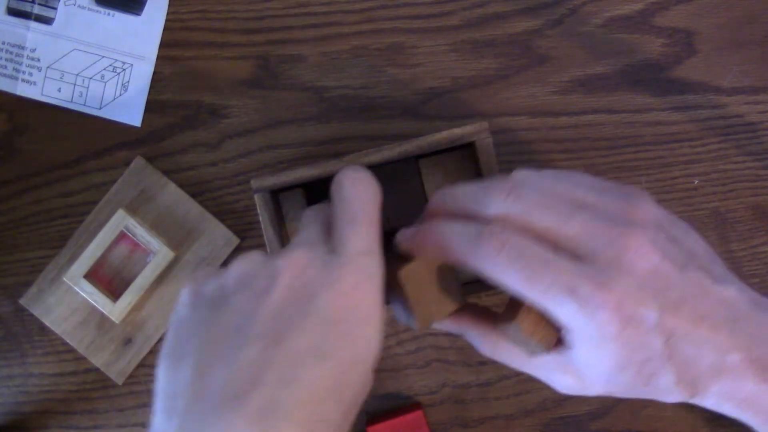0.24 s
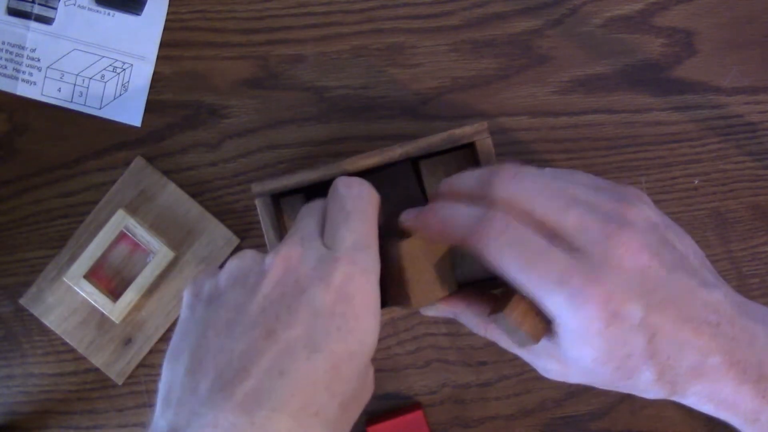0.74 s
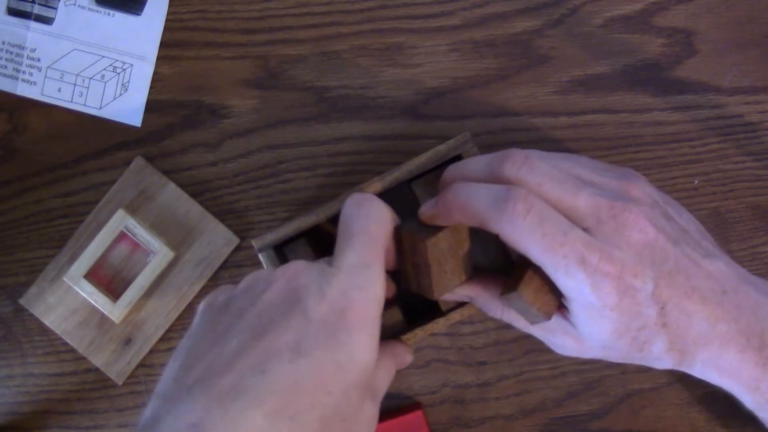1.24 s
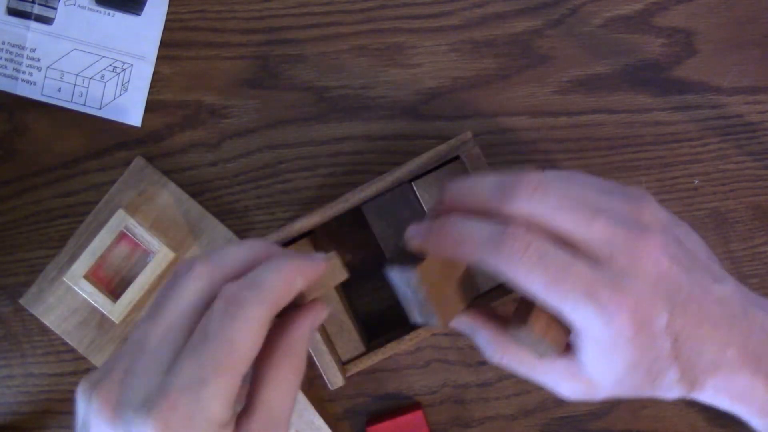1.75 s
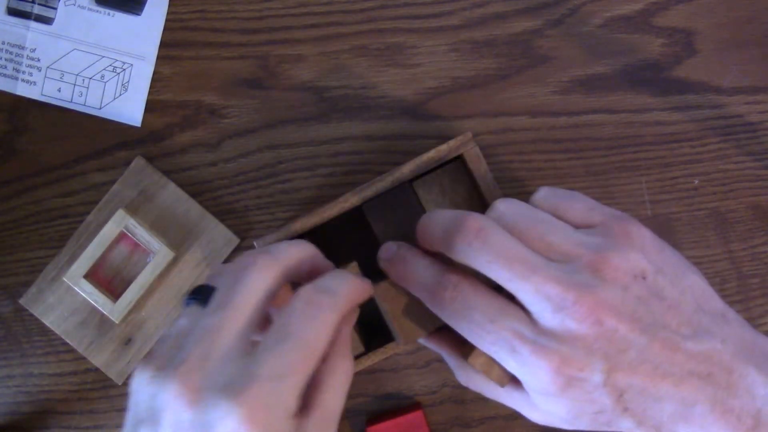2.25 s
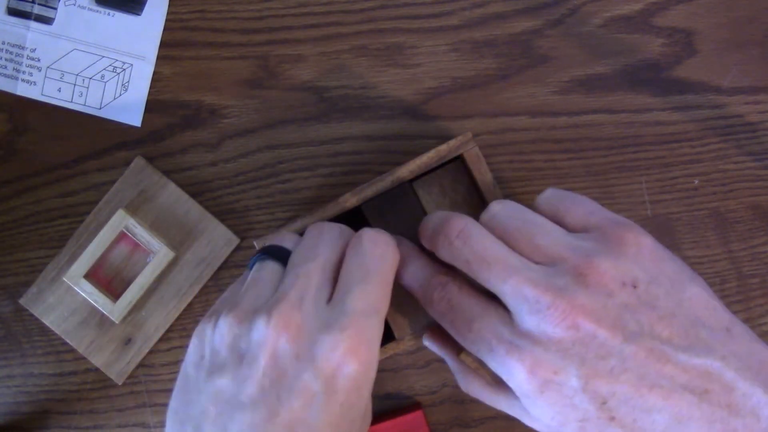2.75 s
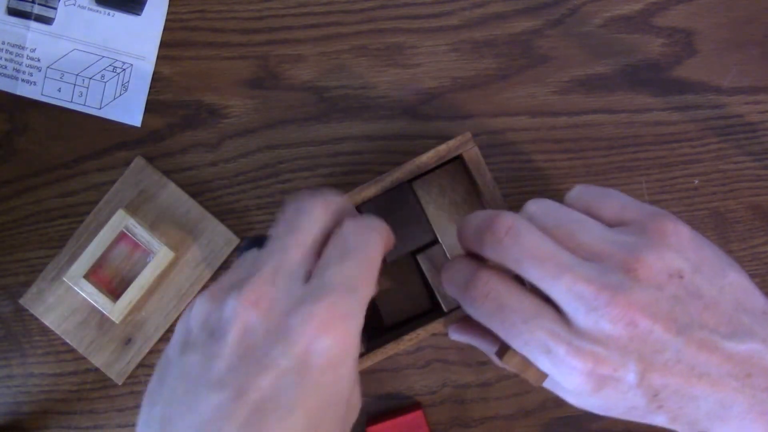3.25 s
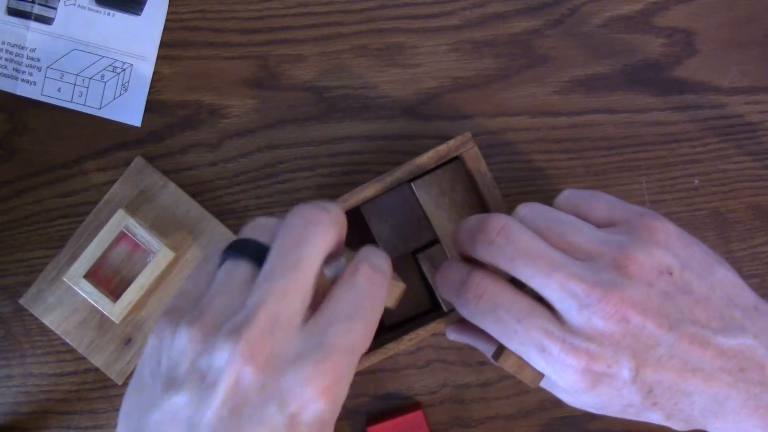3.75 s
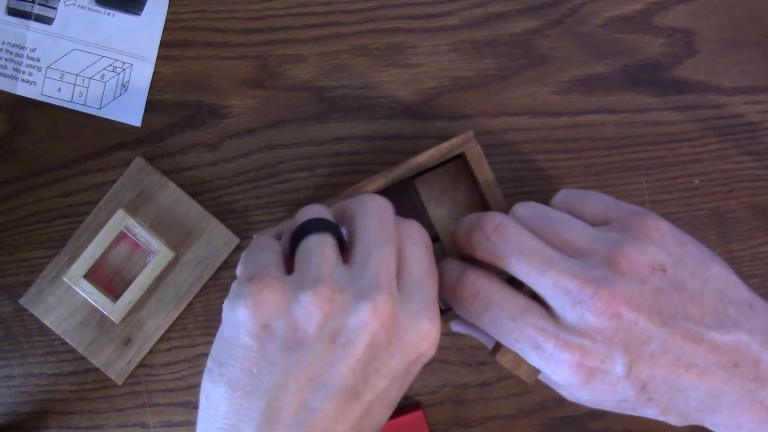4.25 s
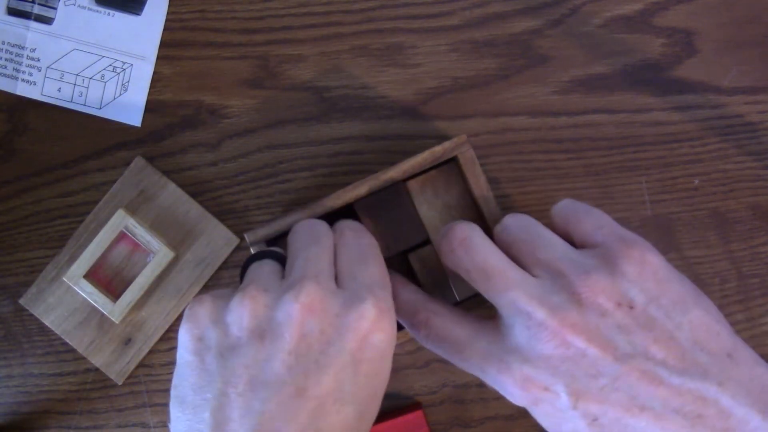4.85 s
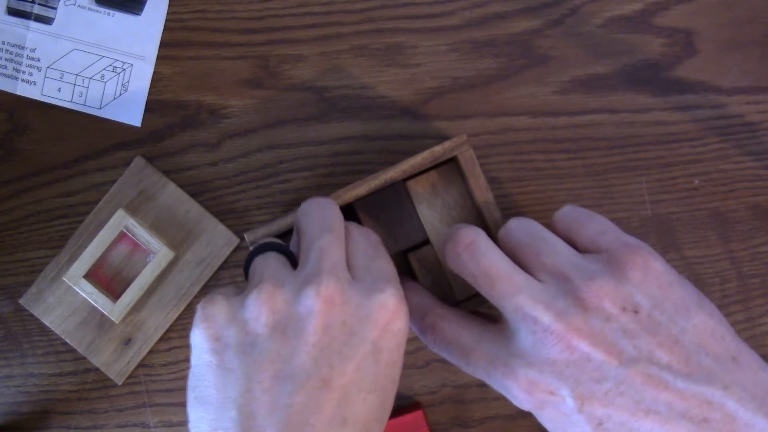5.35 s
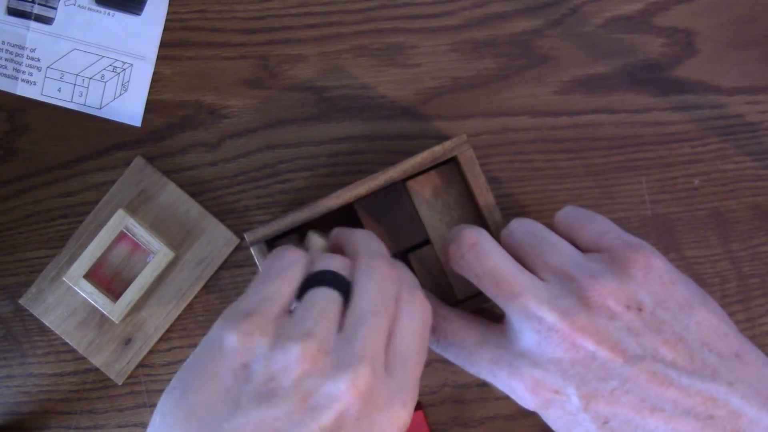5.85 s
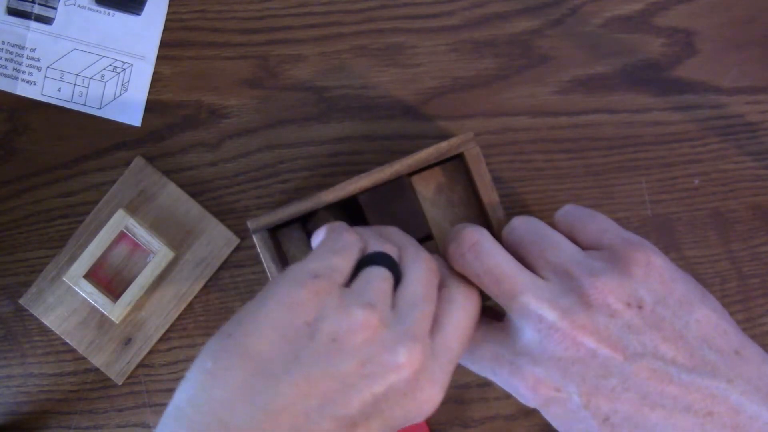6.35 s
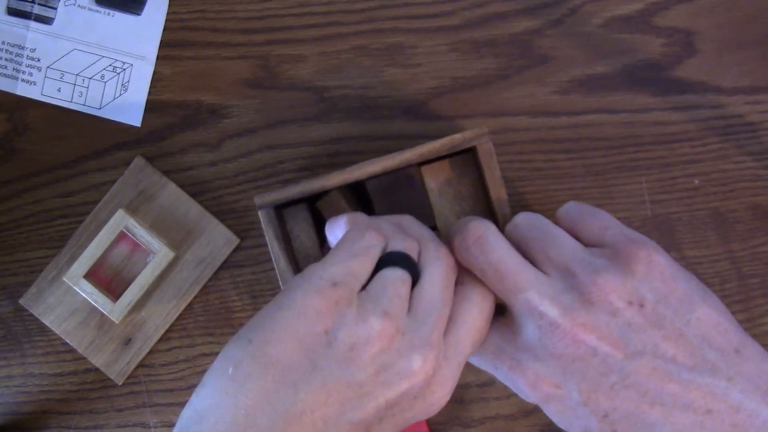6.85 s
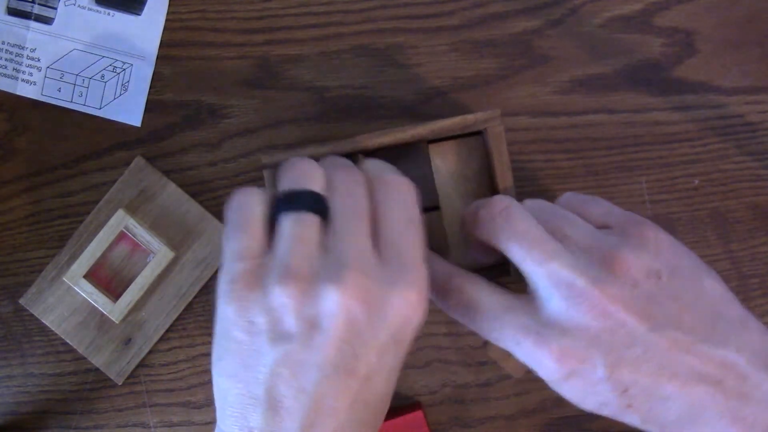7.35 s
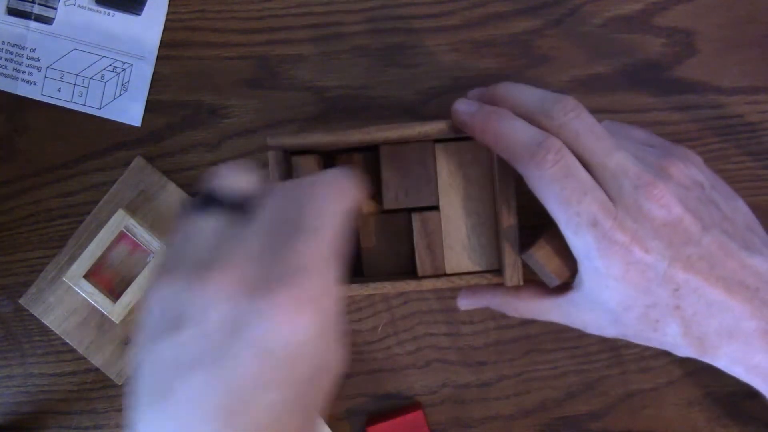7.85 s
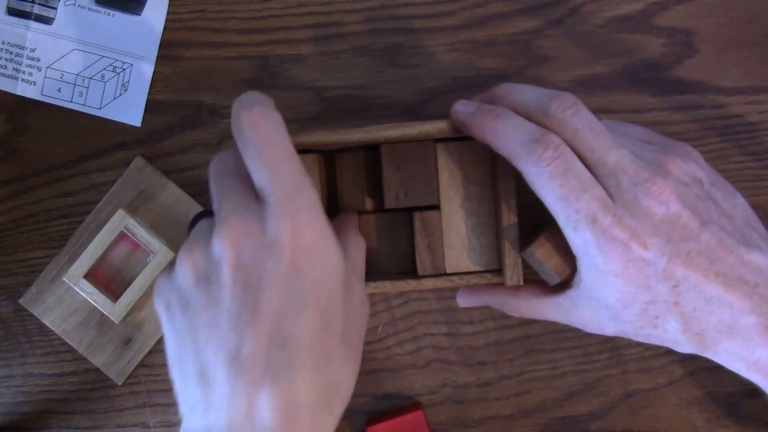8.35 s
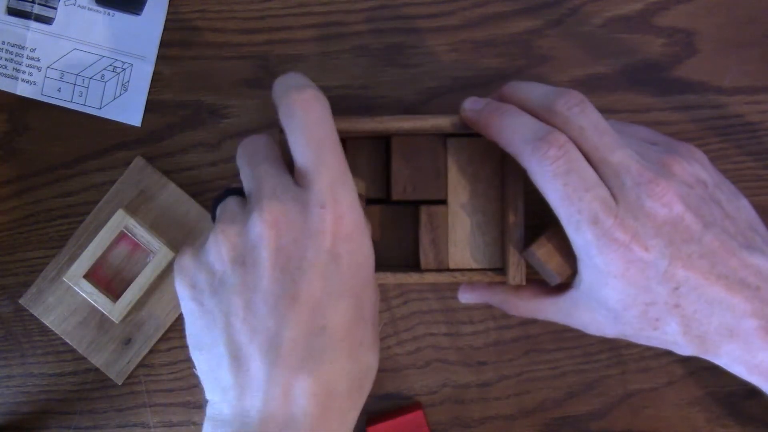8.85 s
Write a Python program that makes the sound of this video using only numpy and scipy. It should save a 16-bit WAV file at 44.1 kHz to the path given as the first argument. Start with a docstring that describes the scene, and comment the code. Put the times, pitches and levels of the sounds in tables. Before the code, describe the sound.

Small hardwood blocks click, clack and scrape sharply inside a little wooden box on a table, with quiet pauses, close in a small room.

```python
"""Hardwood puzzle blocks slid, pressed and dropped into a small wooden box on a table, close, in a small quiet room.
Each contact rings table, box hollow, walls and blocks as damped modes, with a noise snap for the hard edges.
Between contacts, hands and blocks rub (coloured noise in spurts), squeak, judder and rattle; soft low bumps shake the table.
The room answers with near echoes and a short tail, something metal nearby rings faintly as fading noise,
and a limiter catches the hardest clicks on the two-channel track."""
import sys
import numpy as np
from scipy import signal
from scipy.fft import rfft, irfft, next_fast_len
from scipy.io import wavfile
from scipy.ndimage import uniform_filter1d, minimum_filter1d, map_coordinates

SR = 44100
rng = np.random.default_rng(int(sys.argv[2]) if len(sys.argv) > 2 else 0)


def to_wav(s):
    """Save 16-bit WAV."""
    ch = np.atleast_2d(s).T  # columns
    pcm = np.round(np.clip(ch, -1, 1) * 32767)  # PCM
    wavfile.write(sys.argv[1], SR, pcm.astype(np.int16))


N = 401310  # samples in the take
T = np.arange(int(.4 * SR)) / SR  # time axis of one contact, s

# The room's hush at the microphone. Each row: frequency in Hz, relative level in dB per Hz.
HUSH_SPECTRUM = [(25, -13.5), (70, -9.5), (125, -2.5), (300, 0), (480, -1.5), (700, -3.5), (1000, -7.5),
                 (1300, -7), (2000, -15.5), (3000, -14.5), (6000, -22.5), (11000, -25.5), (16000, -38.5)]
# Near surfaces that echo. Each row: delay in seconds, gain as a factor.
ECHOES = [(.0029, 0.25), (.0078, .2), (0.0138, .12)]
# How fast the room's tail dies. Each row: frequency in Hz, t60 in seconds.
ROOM_T60 = [(150, 0.12), (400, 0.28), (1300, 0.17), (3500, 0.16), (8000, 0.12), (15000, 0.11)]
# Stereo width of the room's tail. Each row: frequency in Hz, side level in dB.
ROOM_WIDTH = [(200, -18.5), (1300, -18), (4000, -13), (12000, -9)]

# Soft low bumps. Each row: start in seconds, level in dB, t60 in seconds.
BUMPS = [(2.609, -34, 0.093), (2.689, -29, 0.14), (2.745, -50, 0.32), (4.664, -46.5, .12),
         (5.17, -51, 0.23), (8.571, -54, .12)]
# Deep modes of a bump. Each row: frequency in Hz, level in dB.
BUMP_MODES = [(58, -2.5), (85, -3.5), (112, -8), (152, 2), (178, -3.5)]

# Blows that set the nearby metal ringing. Each row: start in seconds, level in dB.
METAL_RINGS = [(.604, -55.5), (1.048, -57), (2.911, -44)]
# A spring's crowded modes. Each row: frequency in Hz, relative level in dB per Hz.
METAL_SPECTRUM = [(1900, -30.5), (2300, -2), (2550, 0), (2680, -4), (2800, 4), (3050, -2), (3330, -4),
                  (3700, -30.5)]

# How busily the hands shift the box. Each row: time in seconds, effort in dB.
EFFORT = [(0.0, -57.5), (0.2, -57.5), (0.4, -51), (1.32, -54), (1.59, -63.5), (2.18, -59), (2.51, -52),
          (2.89, -53.5), (3.45, -61), (3.88, -60), (4.0, -53), (4.41, -58), (4.69, -53), (5.17, -61),
          (5.67, -54.5), (5.88, -61), (6.08, -55), (6.77, -57), (6.97, -53), (8.21, -60.5), (8.46, -53.5),
          (9.1, -53)]
# Strokes of sliding wood. Each row: middle in seconds, length in seconds, level in dB, hiss over level in dB.
SCUFFS = [(0.272, 0.025, -48, -10.5), (0.405, 0.051, -50, -13), (0.52, 0.057, -61, -13),
          (0.599, .008, -27, -13), (0.622, 0.026, -30, -9), (0.847, 0.14, -58.5, -17),
          (1.194, 0.14, -50.5, -12.5), (1.347, 0.061, -45.5, -2.5), (1.445, 0.023, -40.5, -7.5),
          (1.477, 0.033, -34, -21), (2.429, 0.055, -46.5, -16.5), (2.507, 0.031, -51.5, -22),
          (2.656, 0.027, -51, -29), (2.777, 0.035, -76, 12), (2.847, 0.024, -44, -23),
          (2.932, 0.017, -32, 3), (3.196, 0.053, -55, -3.5), (3.906, 0.071, -54.5, -15),
          (4.059, 0.036, -50, -21.5), (4.407, 0.029, -54.5, 1), (5.527, 0.018, -47, -19.5),
          (5.642, 0.037, -56, -12), (5.861, 0.023, -64.5, 4), (6.326, 0.022, -53, -15),
          (6.685, 0.027, -48, -15), (6.932, 0.11, -61, -2.5), (7.02, 0.055, -49, -17),
          (7.123, 0.016, -42.5, -15), (7.273, 0.045, -58.5, -11), (7.345, 0.015, -46, -5),
          (7.418, 0.028, -38, -17), (7.721, 0.06, -55.5, -16), (8.206, 0.041, -62.5, 2),
          (8.336, 0.074, -55.5, -8.5), (8.49, 0.042, -38.5, -12), (9.034, 0.077, -40.5, -7)]
# Rumble of the handled box. Each row: frequency in Hz, relative level in dB per Hz.
HANDLING_SPECTRUM = [(60, -34.5), (110, -14), (160, -5), (215, 1.5), (270, -7.5), (340, -2.5), (460, -3.5),
                     (600, -7.5), (780, -14), (1100, -17), (1600, -40)]
# Wood scraping on wood. Each row: frequency in Hz, relative level in dB per Hz.
SCRAPE_SPECTRUM = [(500, -23), (900, -8), (1150, -5.5), (1280, 0), (1550, -6.5), (2000, -11), (3200, -15.5),
                   (5000, -42)]
# Skin brushing wood. Each row: frequency in Hz, relative level in dB per Hz.
SKIN_SPECTRUM = [(1500, -20.5), (3000, 2.5), (5000, 5.5), (7000, -0.5), (8500, -1), (12000, -12.5),
                 (16000, -19.5)]
# Wood squeaks. Each row: middle in seconds, length in seconds, pitch in Hz, level in dB.
SQUEAKS = [(2.672, 0.015, 3620, -59), (2.745, 0.07, 3700, -58), (2.837, .014, 3580, -52),
           (4.403, 0.021, 1770, -38.5), (4.404, 0.024, 4960, -55), (5.864, 0.029, 4750, -57)]

# Modes of the table top. Each row: frequency in Hz, level in dB, t60 in seconds.
TABLE_MODES = [(145, -12, 0.077), (161, -5, 0.16), (216.1, 0.5, 0.18), (241, -7.5, 0.046), (314, -7, .12),
               (375, -4, 0.15), (468, 2.5, 0.11), (582.7, -1.5, 0.13), (750, -5, 0.025), (854, -3.5, 0.088),
               (976, -1, 0.067)]
# Modes of the hollow of the box. Each row: frequency in Hz, level in dB, t60 in seconds.
HOLLOW_MODES = [(1206.6, -12, 0.061), (1247.5, 0.5, 0.029), (1346.3, 0.5, 0.031), (1440, -10.5, 0.0096)]
# Modes of the box walls. Each row: frequency in Hz, level in dB, t60 in seconds.
WALL_MODES = [(1565, 0, 0.019), (1736, 3, 0.024), (1877, -3, 0.027), (2215, 1.5, 0.012), (2600, -3, 0.0046)]
# Modes of the blocks. Each row: frequency in Hz, level in dB, t60 in seconds.
BLOCK_MODES = [(2844, -2, 0.01), (3000, -3, 0.015), (3298, 6.5, 0.0072), (3460, -6.5, 0.023),
               (3810, 1, 0.013), (3930, -3.5, 0.0022), (4380, -7, 0.0023)]
# Crack of two hard edges. Each row: frequency in Hz, relative level in dB per Hz.
EDGE_SPECTRUM = [(1500, -26.5), (3000, -8), (4400, 0), (5200, 7), (7000, -0.5), (9000, -7), (12000, -19),
                 (16000, -28.5)]

# A loose block rattling to rest. Each row: start in seconds, length in seconds, gap in seconds,
# strength in dB, hardness in dB, loss a contact in dB.
RATTLES = [(2.9214, .029, .0082, -25, 1, 0), (7.8953, .054, 0.02, -23, 0, 10.5),
           (8.7412, .036, .0148, -23.5, 1.5, 4)]
# Fingertips nudging a block. Each row: start in seconds, strength in dB.
NUDGES = [(2.072, -65.5), (2.2547, -58), (3.1699, -61.5), (3.8288, -59), (4.1849, -58), (4.592, -50),
          (5.0145, -55.5), (5.8038, -54), (5.9554, -50), (6.0864, -56.5), (6.8404, -61), (6.8776, -54.5),
          (7.3824, -55), (7.4047, -52), (8.573, -63), (8.615, -59.5)]
# Blocks striking wood. Each row: start in seconds, strength in dB, hardness in dB,
# box hollow over strength in dB, table thud over strength in dB.
HITS = [(0.1557, -37.5, -3, 2.5, -5.5), (0.17, -60, 0, 6, 12), (0.3075, -43, -1, 19.5, 7.5),
        (0.4052, -32, -7, 13.5, -3.5), (0.426, -21, 11, 11.5, -27), (0.44, -26, 8.5, 12, -23),
        (0.5044, -51, -4, 26, 9), (0.6036, -13, 5.5, -10.5, -19), (0.6089, -20, 1.5, -4.5, -25),
        (0.6552, -36, -5, 6, -33), (0.6822, -20.5, 6.5, 1, -21.5), (0.687, -39, 7, 15.5, -9),
        (0.9733, -52.5, 6, -4, 0.5), (1.0326, -34.5, 2, 4, -10.5), (1.049, -16.5, 7, 10, -27),
        (1.823, -51.5, -7, 0, -9.5), (2.2816, -40, -2, -2, 5), (2.5725, -56.5, -11.5, -6, 2.5),
        (2.583, -55.5, -12, -12, -4), (2.8653, -47, -5, 11, 1.5), (2.8797, -45.5, -2, 20, -14),
        (2.9104, -15.5, 5, -26, -35), (2.9135, -12.5, 5, -6.5, -21.5), (2.9518, -17, 5, 9, -31),
        (2.961, -23.5, 1, -12.5, -19), (3.2149, -47, -1, 9, -16), (4.0027, -44, -5.5, 9.5, -7),
        (4.628, -43, -6, 8.5, -5), (4.692, -52, -4.5, -10, -13.5), (4.7544, -34.5, -4, -3, -5.5),
        (4.762, -30.5, -0.5, 2.5, -1.5), (4.8035, -35.5, -2.5, 1, -2.5), (5.1263, -26.5, -1, -11, -16.5),
        (5.1406, -43, -11, 3, 0), (5.4731, -34, -4.5, 8, -7), (5.4967, -49, 0.5, 10, -15),
        (6.03, -39, -5.5, 7.5, -5), (6.913, -57, 3, -8, 12), (7.0047, -50, -2, -5, 5),
        (7.043, -25.5, -0.5, -2.5, -12.5), (7.3432, -42, -8, 5, -18), (7.4208, -26.5, -0.5, 4, -12.5),
        (7.4281, -27.5, -3.5, -7.5, -18.5), (7.6873, -50, -3.5, 0, 2.5), (7.7475, -36, -1, 18.5, -14.5),
        (7.8609, -22, -5, -2, -14.5), (7.865, -25, 7, 6.5, -8.5), (8.1784, -62.5, 0.5, 24.5, 12),
        (8.2978, -44.5, 3, 15.5, -3.5), (8.3684, -49, -8, 19, -9), (8.4185, -51, -13, 16, 8),
        (8.4512, -47, 0, 12.5, -9), (8.7222, -28, -1.5, 2, -11.5), (8.7355, -19, 7.5, -14, -21),
        (8.7827, -25.5, 5, -8, -16), (8.7876, -20.5, 6, -14, -14), (8.8217, -48, -1, -3, 4),
        (8.9915, -32.5, -4.5, 8, -7), (9.012, -37.5, -2.5, -4, -5)]

DRAG_DB, DRAG_SPREAD = -55, 1.3  # rumble under each stroke: level, and length in stroke lengths
SHIFT_DB, SHIFT_LEAD_S, SHIFT_LENGTH_S = -58, .012, 0.042  # the box shifting just before each contact
JUDDER_S, JUDDER_LENGTH_S, JUDDER_GAP_S = 1.474, 0.027, .0085  # middle, length, time between slips
JUDDER_DB = -37.5  # strength of the middle slip
SNAP_DB, SNAP_GROWS = -11, 0.98  # edge snap against contact strength, and its dB per dB of hardness
FORCE_DB, FORCE_BRIGHTENS = -30, 0.1  # strength where force adds no snap, and snap dB per dB above it
TOP_HZ = 16100  # band limit of the track


def amp(db):
    """Decibels as an amplitude factor."""
    return 10 ** (np.asarray(db) / 20)


def unit(x):
    """x at rms 1."""
    return x / np.sqrt(np.mean(x ** 2) + 1e-20)


def along(points, hz):
    """(Hz, value) points read off on a log frequency axis."""
    f, v = np.transpose(points)
    return np.interp(np.log(hz + 1), np.log(f + 1), v)


def filtered(x, response):
    """x times a response of frequency."""
    n = x.shape[-1]
    m = next_fast_len(n + 4096)
    spectrum = rfft(x, m) * response(np.fft.rfftfreq(m, 1 / SR))
    return irfft(spectrum, m)[..., :n]


def coloured(x, spectrum):
    """x with a (Hz, dB) spectrum, at rms 1."""
    return unit(filtered(x, lambda hz: amp(along(spectrum, hz))))


def wobble(rate):
    """A smooth random curve, rate knots a second."""
    knots = rng.standard_normal(int(N * rate / SR) + 4)
    return map_coordinates(knots, [np.arange(N) * rate / SR], order=2)


def swell(middle, length):
    """The level of one short stroke over time, 1 at its middle."""
    return np.exp(-2 * ((np.arange(N) / SR - middle) / length) ** 2)


def spread(pair, side_db):
    """Left and right from a middle and a weaker side signal."""
    side = amp(side_db) * pair[1]
    return np.array([pair[0] + side, pair[0] - side])


def add(track, s, sound):
    """Mix a sound in at s seconds."""
    i = max(round(s * SR), 0)
    track[..., i:i + sound.shape[-1]] += sound[..., :max(N - i, 0)]


def hush():
    """Room tone: steady coloured noise, spread wide across the two channels."""
    return amp(-60.5) * spread(coloured(rng.standard_normal((2, N)), HUSH_SPECTRUM), side_db=-7)


def room(wet_db, build):
    """Direct sound, echoes off near surfaces, and a diffuse tail that builds up and dies by frequency."""
    hz, t, z = signal.stft(rng.standard_normal((2, len(T))), SR, nperseg=256)
    z[1] *= amp(along(ROOM_WIDTH, hz))[:, None]
    decay = amp(-60 * t / along(ROOM_T60, hz)[:, None])
    tail = signal.istft(z * decay, SR, nperseg=256)[1][:, :len(T)]
    mid, side = tail * (1 - np.exp(-T / build))
    answer = amp(wet_db) * np.array([mid + side, mid - side]) / np.linalg.norm(mid)
    answer[:, 0] += 1  # the direct sound
    for delay, gain in ECHOES:
        answer[:, round(delay * SR * rng.uniform(.9, 1.1))] += gain
    return answer


def bumps():
    """Soft, dull bumps shake the table: deep modes with a slow onset, dying together."""
    out = np.zeros(N)
    for s, db, t60 in BUMPS:
        shake = sum(amp(level) * np.sin(2 * np.pi * (hz * T + rng.random())) for hz, level in BUMP_MODES)
        onset = 1 - np.exp(-(T / .008) ** 2)
        add(out, s, amp(db - 60 * T / t60) * onset * shake)
    return out


def metal(t60):
    """The hardest blows leave something like a steel spring ringing faintly, its many modes blurred into noise."""
    out, t = np.zeros(N), np.arange(2 * SR) / SR
    for s, ring_db in METAL_RINGS:
        blur = coloured(rng.standard_normal(len(t)), METAL_SPECTRUM)
        add(out, s, amp(ring_db - 60 * t / t60) * blur)
    return out


def shifts():
    """The level of the box shifting under the hand: one swell leading into each contact."""
    power, t = np.zeros(N), T - T[-1] / 2
    for s, *_ in HITS + NUDGES:
        add(power, s - SHIFT_LEAD_S + t[0], np.exp(-2 * (t / SHIFT_LENGTH_S) ** 2) ** 2)
    return amp(SHIFT_DB) * np.sqrt(power)


def friction(spectrum, grain_db, grain_rate):
    """Surfaces catch and slip: noise in quick uneven spurts, coloured by what is rubbed."""
    spurts = rng.standard_normal((2, N)) * amp(grain_db * wobble(grain_rate))
    return spread(coloured(spurts, spectrum), side_db=-20)


def catches(rate, size_db):
    """The wood's grain catches now and then as blocks slide: tiny ticks of uneven size, at rms 1."""
    chance, size = rng.random(N), rng.standard_normal(N)
    ticks = (chance < rate / SR) * np.sign(size) * amp(size_db * np.abs(size))
    return coloured(ticks, SCRAPE_SPECTRUM)


def rubbing():
    """One effort drives box rumble, block scrape and skin brush; single strokes swell over it."""
    s, level_db = np.transpose(EFFORT)
    effort_db = np.interp(np.arange(N) / SR, s, level_db)
    grip = wobble(9.6)
    rumble = np.hypot(amp(effort_db - 3.0 + 1.3 * grip), shifts())
    scrape = amp(effort_db - 5.5 + 2.2 * grip)
    skin = amp(-69.0 + .35 * (effort_db - level_db.mean()) + .8 * grip)
    for middle, length, db, hiss_db in SCUFFS:
        stroke = amp(db) * swell(middle, length)
        scrape = scrape + stroke
        skin = skin + amp(hiss_db) * stroke
        rumble = np.hypot(rumble, amp(DRAG_DB) * swell(middle, DRAG_SPREAD * length))
    out = rumble * friction(HANDLING_SPECTRUM, grain_db=2.0, grain_rate=74)
    out += scrape * amp(1.5 * wobble(55)) * friction(SCRAPE_SPECTRUM, grain_db=2.0, grain_rate=250)
    out += scrape * amp(-6) * catches(rate=90, size_db=5)
    out += skin * friction(SKIN_SPECTRUM, grain_db=1.5, grain_rate=560)
    return out


def squeaks(width):
    """A tight fit slips and squeaks: friction noise in one narrow resonance, width a share of its pitch."""
    out = np.zeros(N)
    for middle, length, centre, db in SQUEAKS:
        band = filtered(rng.standard_normal(N), lambda hz: 1 / (1 + (2 * (hz / centre - 1) / width) ** 2))
        out += amp(db) * swell(middle, length) * unit(band)
    return out


def radiated(x, cut_hz):
    """A small body radiates little bass: a high-pass at cut_hz."""
    return signal.sosfilt(signal.butter(2, cut_hz, 'high', fs=SR, output='sos'), x)


def strike(modes, scatter_db, detune, attack, crowd_db, size):
    """Damped modes at strengths that depend on the spot struck; rms 1 over the first size samples."""
    hz, db, t60 = np.transpose(modes)[:, :, None]
    level, pitch, side = rng.standard_normal((3, len(modes), 1))
    t = T[:int(min(t60.max(), .4) * SR)]
    decay = amp(db + scatter_db * level - 60 * t / t60)
    ring = np.sign(side) * decay * np.sin(2 * np.pi * hz * (1 + detune * pitch) * t)
    # a crowd of weak modes fills the gaps between the strong ones
    band = signal.butter(4, [hz.min(), hz.max()], 'band', fs=SR, output='sos')
    crowd = signal.sosfilt(band, rng.standard_normal(len(t)) * amp(-60 * t / t60.mean()))
    ring = unit(ring.sum(0) * (1 - np.exp(-t / attack))) + amp(crowd_db) * unit(crowd)
    ring = radiated(np.pad(ring, (0, len(T) - len(t))), hz.min() * .7)
    return ring / np.sqrt(np.mean(ring[:size] ** 2))


def snap(t60, chatter_db, chatter_t60, size):
    """Two hard edges crack together and chatter briefly; rms 1 over the first size samples."""
    decay = amp(-60 * T / t60) + amp(chatter_db - 60 * T / chatter_t60)
    crack = coloured(rng.standard_normal(len(T)), EDGE_SPECTRUM) * decay
    return crack / np.sqrt(np.mean(crack[:size] ** 2))


def knock(strength_db, hardness_db, hollow_db, thud_db, pitch=1):
    """One contact in the room: the harder, the less the walls clack and the more block and edge click."""
    hollow = np.array(HOLLOW_MODES) * [pitch, 1, 1]
    blow = amp(thud_db) * strike(TABLE_MODES, scatter_db=2.5, detune=0.019, attack=0.0028,
                                 crowd_db=-6.0, size=1320)
    blow += amp(hollow_db) * strike(hollow, scatter_db=1.5, detune=.01, attack=.001,
                                    crowd_db=-15, size=310)
    blow += amp(-hardness_db) * strike(WALL_MODES, scatter_db=2.0, detune=0.027, attack=.00014,
                                       crowd_db=-4.5, size=310)
    blow += amp(hardness_db) * strike(BLOCK_MODES, scatter_db=1, detune=0.021, attack=0.00025,
                                      crowd_db=-6.5, size=310)
    edge = radiated(snap(t60=0.016, chatter_db=-17.5, chatter_t60=0.052, size=310), cut_hz=600)
    force_db = FORCE_BRIGHTENS * (strength_db - FORCE_DB)
    blow += amp(SNAP_DB + SNAP_GROWS * hardness_db + force_db) * edge
    return amp(strength_db) * signal.fftconvolve(blow[None], room(wet_db=-12.0, build=0.0096), axes=1)


def judder(sag_per_s):
    """A block dragged over the box floor sticks and slips; slips swell and fade, the hollow note sinks."""
    out = np.zeros((2, N))
    for u in JUDDER_GAP_S * np.arange(-2, 3):  # seconds from the middle slip
        db = JUDDER_DB + 20 * np.log10(np.exp(-2 * (u / JUDDER_LENGTH_S) ** 2))
        slip = knock(db, hardness_db=1, hollow_db=20, thud_db=-19, pitch=.955 - sag_per_s * u)
        add(out, JUDDER_S + u, slip)
    return out


def rattles(softening):
    """A loose block strikes again and again at nearly even gaps; any loss makes each contact weaker and softer."""
    out = np.zeros((2, N))
    for s, length, gap, db, hardness_db, loss_db in RATTLES:
        for k, delay in enumerate(np.arange(0, length, gap)):
            lost_db = k * loss_db
            contact = knock(db - lost_db, hardness_db - softening * lost_db, hollow_db=-5, thud_db=-18)
            add(out, s + delay * rng.normal(1, .02), contact)
    return out


def contacts():
    """Single knocks, each with its own touch, and soft nudges that share one dull, heavy touch."""
    out = np.zeros((2, N))
    for s, *touch in HITS:
        add(out, s, knock(*touch))
    for s, db in NUDGES:
        add(out, s, knock(db, hardness_db=-8, hollow_db=9.5, thud_db=6.5))
    return out


def scene():
    """Knocks, rubbing and bumps over the hush of the room, a touch left of centre."""
    background = hush() + bumps() + metal(t60=1.9)
    puzzle = rubbing() + squeaks(width=.08) + judder(sag_per_s=1.4) + rattles(softening=0.26) + contacts()
    return (background + puzzle) * amp([[.2], [-.2]])


def record(dry):
    """A fast limiter holds peaks to full scale, then a steep low-pass sets the band limit."""
    needed = 1 / np.maximum(np.abs(dry).max(0), 1)
    gain = uniform_filter1d(minimum_filter1d(needed, size=30), size=20)
    return filtered(dry * gain, lambda hz: 1 / (1 + (hz / TOP_HZ) ** 80))


dry = scene()
out = record(dry)
to_wav(out)
```